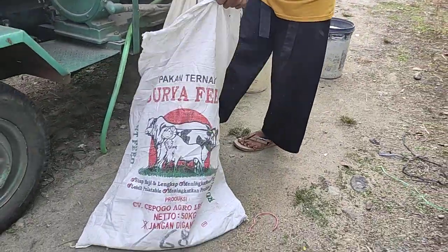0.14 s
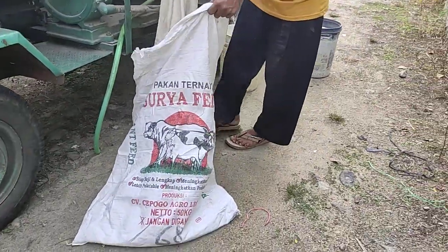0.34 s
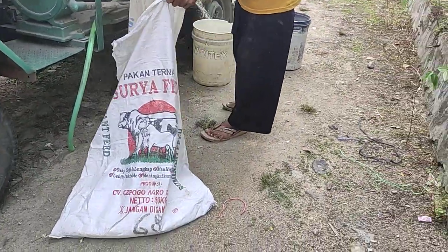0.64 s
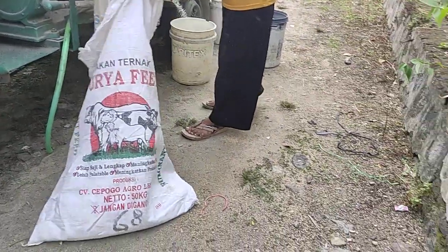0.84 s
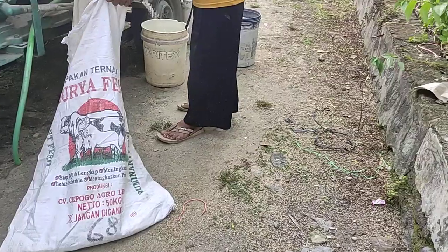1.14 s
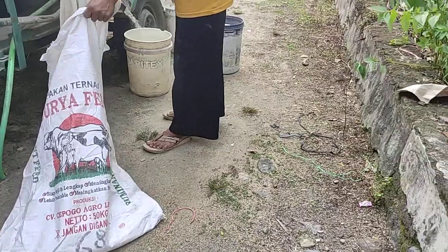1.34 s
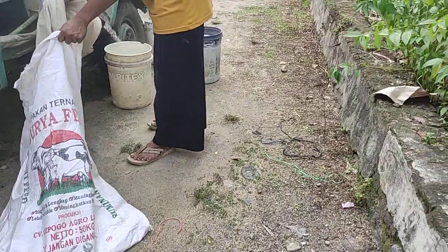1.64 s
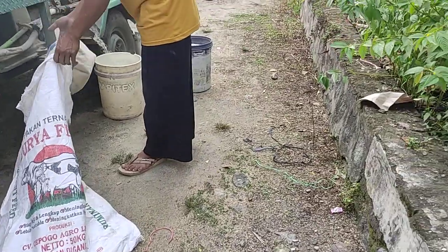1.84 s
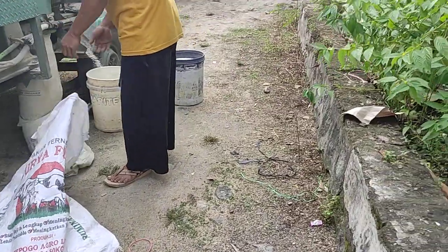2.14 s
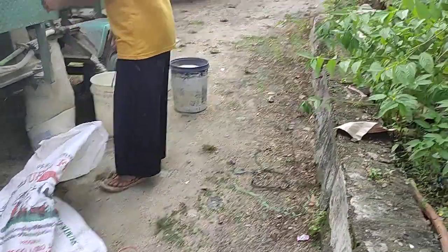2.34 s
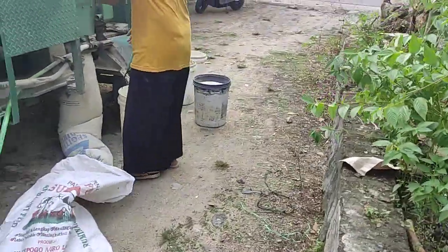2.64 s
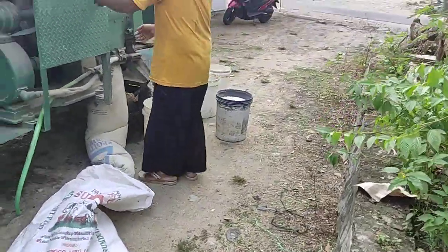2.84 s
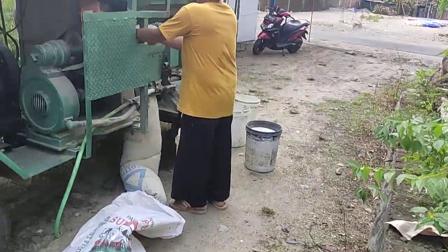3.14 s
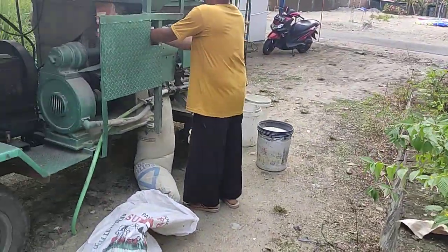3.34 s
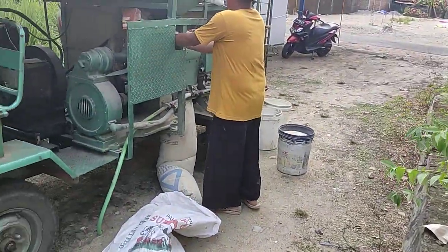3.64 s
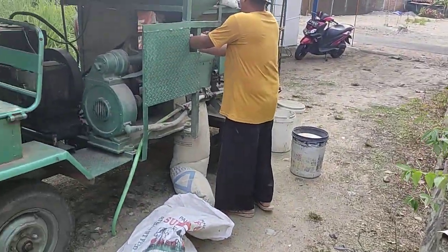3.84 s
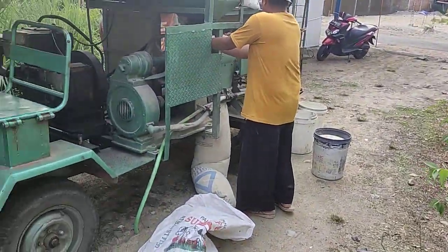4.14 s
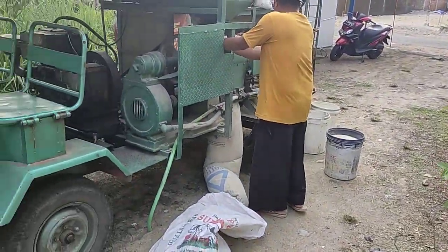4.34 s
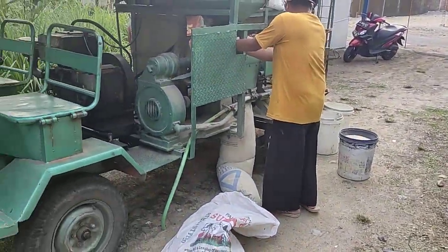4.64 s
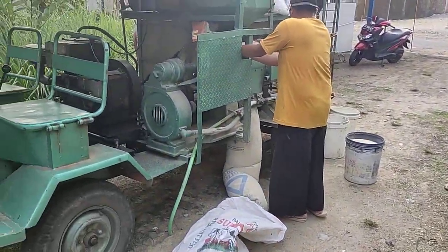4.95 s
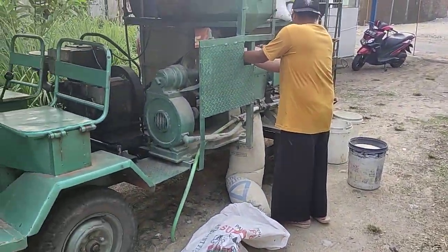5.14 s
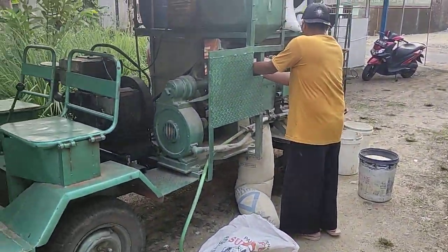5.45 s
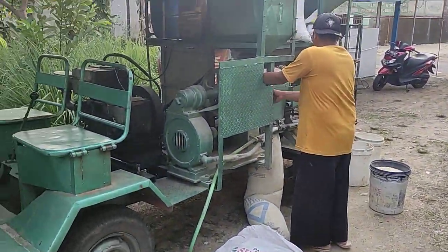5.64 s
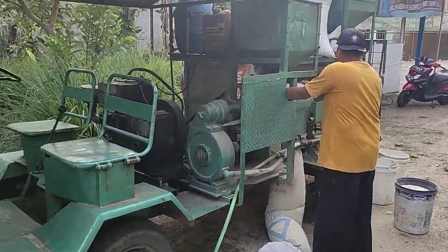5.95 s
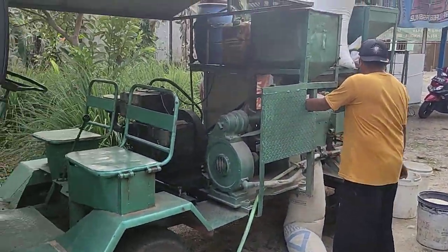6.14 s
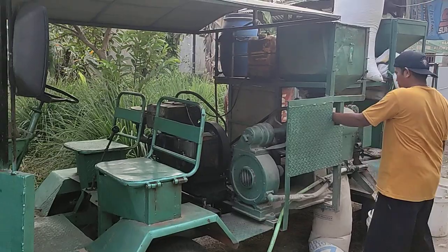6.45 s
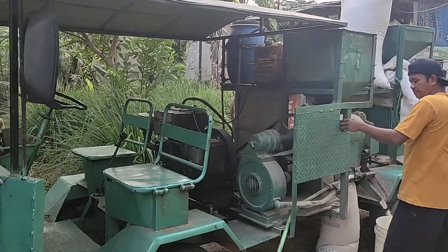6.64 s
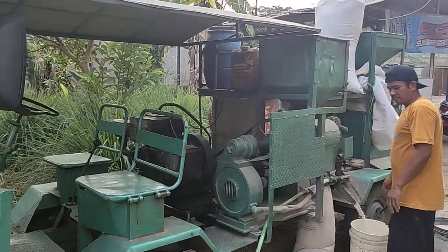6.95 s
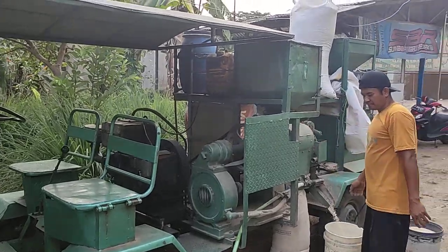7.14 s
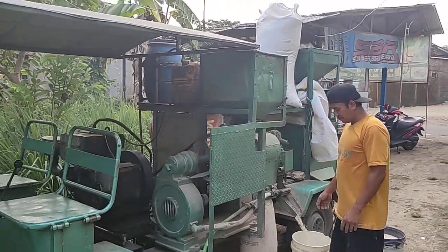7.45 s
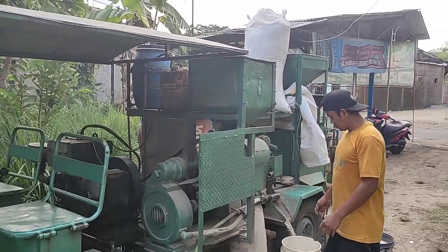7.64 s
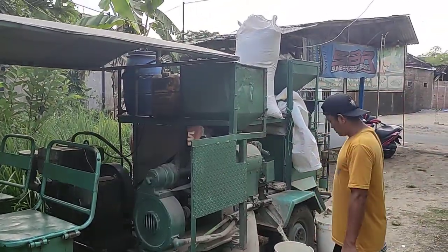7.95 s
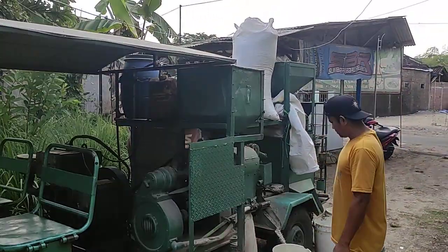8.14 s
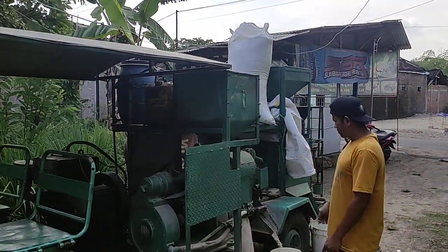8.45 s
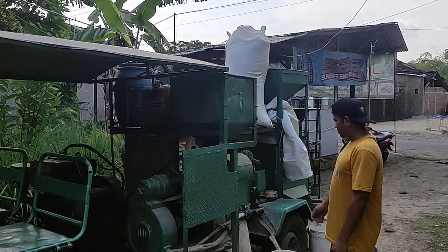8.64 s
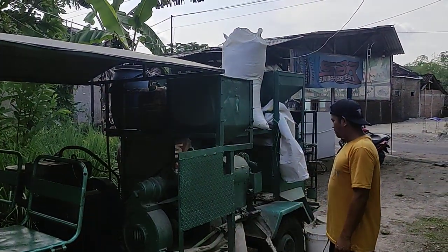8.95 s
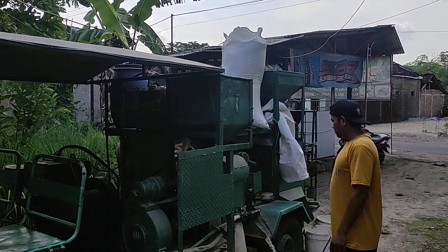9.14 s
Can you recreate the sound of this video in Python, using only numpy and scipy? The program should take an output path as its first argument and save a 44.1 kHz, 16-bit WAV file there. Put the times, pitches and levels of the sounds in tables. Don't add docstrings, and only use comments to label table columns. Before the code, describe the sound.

From 0 s to the end at about 9.3 s, a single-cylinder diesel drives a rice huller and polisher outdoors, heard loudly from a few steps away. It fires a little over nine times a second, speed wavering slightly: each cycle gives a hard metallic knock ringing near 1 kHz, a low-mid exhaust thud and a frame jolt. Valve and gear clatter pulses through a dense roar of rollers, belts, grain and a faint high blower whistle. From about 0.8 to 2.9 s the knock recedes behind the machine and hollow duct resonances colour the noise; by 3 s it returns plainly. Later the roller hiss brightens, with a chute-like resonance after 7.5 s. A loose guard sheet ticks firmly at 4.8 s, faintly at 7.3, lightly at 7.6 and hardest at 8.6. The hand-held stereo microphone drifts, its sides unequally bright, bass thin, peaks compressed and slightly clipped.

```python
import sys
import numpy as np
from scipy import signal
from scipy.fft import rfft, irfft, next_fast_len
from scipy.io import wavfile
from scipy.ndimage import map_coordinates

SR = 44100
rng = np.random.default_rng(int(sys.argv[2]) if len(sys.argv) > 2 else 0)


def field_ratio(decibels):
    return 10 ** (np.asarray(decibels, dtype=float) / 20)


def master(y):
    cut = np.clip(np.atleast_2d(y).T, -1, 1)
    pcm = np.round(cut * 32767)
    wavfile.write(sys.argv[1], SR, pcm.astype(np.int16))


N = 409248


def firings():
    # time_s, firings_per_s
    speed = [(0.053, 9.4069), (0.827, 9.4207), (1.6, 9.3702), (2.373, 9.2713), (3.147, 9.3348),
             (3.92, 9.4013), (4.693, 9.2549), (5.467, 9.1353), (6.24, 9.1474), (7.013, 9.2183),
             (7.787, 9.1959), (8.56, 9.3134), (9.333, 9.3325)]
    t = np.arange(-200, 9400) / 1000
    cycles = np.cumsum(np.interp(t, *np.transpose(speed))) / 1000
    cycles = cycles - cycles[200] + 0.1002
    return np.interp(np.arange(0, int(cycles[-1])), cycles, t)


def knock():
    # pitch_hz, level_db, t60_s
    block = [(788, -11, 0.47), (850, 0, 0.13), (910.4, 0, 0.098), (1020, -42, 0.1), (1095, -0.5, 0.16),
             (1160, -9, 0.072), (1280, -9, 0.042), (1723, 6, 0.26), (3850, -26, .01)]
    hidden, _ = walk(firings())
    shadow_db, scatter_db = -11.5, 0.7
    peak_db = -8.5 + shadow_db * hidden + scatter_db * rng.standard_normal(len(hidden))
    blow = struck(-0.001843, peak_db - 28.5, block, scatter_db=0.8, soft_s=0.0001)
    return ring(blow, hz=900, t60=0.012)


def exhaust():
    # pitch_hz, level_db, t60_s
    pipe = [(294.5, -4, 0.045), (234, -15, 0.11), (351, -8.5, 0.082)]
    cycle_s = np.gradient(firings())
    late_s = 0.4925 * cycle_s - 0.0034
    peak_db = -8 + 0.6 * rng.standard_normal(len(cycle_s))
    puff = struck(late_s, peak_db - 27, pipe, scatter_db=0.8, soft_s=0.0001)
    hidden, _ = walk(np.arange(N) / SR)
    return_db = 3 + 0.5 * hidden
    return echo(ring(puff, hz=305, t60=0.02), 0.0051, return_db)


def frame_thump():
    # pitch_hz, level_db, t60_s
    frame = [(231, -1.5, 0.12), (198, -12, 0.033), (366, -19, 0.03), (92, -16, 0.12)]
    return struck(0.02272, np.full(len(firings()), -11.0), frame, scatter_db=1.1, soft_s=0.00071)


def roar(patchy_db):
    # late_cycles, rise_s, fall_s, level_db over the roar,
    # centre_hz, width_octaves, scatter_db
    bursts = [
        (-.04, 0.003, 0.045, 3, 2350, 2.32, 1),
        (.13, 0.0027, 0.012, 0, 4740, 1.33, 2.5),
        (.18, 0.0037, 0.0074, 5, 13000, 1.7, 3),
        (.40, 0.0033, 0.0097, -3, 6000, 3.1, 2.5),
        (.73, .003, 0.017, -9.5, 12000, 0.31, 7),
        (.75, 0.0099, 0.014, 1, 111, 0.34, -3),
        (.20, 0.0029, 0.0065, 4, 111, 1.75, -2),
    ]
    # pitch_hz, level_db per Hz
    rumble = [(18, -61), (30, -45), (98, -1.5), (167, -2.5), (225, 6), (307, 3.5), (365, 4.5), (427, 0.5),
              (535, -5.5), (615, -4.5), (840, 2), (1090, 2), (1490, -2.5), (1740, -3.5), (1900, -9.5),
              (2470, -48), (4180, -120)]
    # pitch_hz, level_db per Hz
    hiss = [(1400, -16), (1900, 5), (2600, 6.5), (3200, 1.5), (4000, 1.5), (5500, -5.5), (6800, -6),
            (7000, -13.5), (8800, -3.5), (10000, -11), (11500, -25.5), (11700, -14), (14300, -20.5),
            (15300, -51)]
    # pitch_hz, share_0_to_1
    likeness = [(60, .96), (350, .95), (520, .88), (860, .8), (1300, .7), (2000, .62), (3000, .5),
                (5000, .2), (9000, .05)]
    # pitch_hz, change_db
    plain_view = [(400, 0), (570, -2.5), (870, -2.5), (1200, 0), (1700, -0.5), (2500, 1), (4300, -2.5),
                  (9000, 0)]
    # pitch_hz, change_db
    when_hidden = [(400, 2), (570, 5.5), (870, -4.5), (1200, -0.5), (1700, 6.5), (2500, 0), (4300, -2.5),
                   (9000, 2.5)]
    # pitch_hz, change_db
    when_swung = [(400, -1), (570, 0), (870, 2.5), (1200, -3.5), (1700, -3), (2500, -1.5), (4300, 7.5),
                  (9000, 0.5)]

    luck = np.clip(rng.standard_normal((len(firings()), len(bursts))), -2, 1.2)
    swells = []
    for k, (late, rise, fall, db, _, _, scatter_db) in enumerate(bursts):
        clicks = strokes(late, field_ratio(2 * (db + scatter_db * luck[:, k])))
        swells.append(smooth(smooth(clicks, rise), fall) * (rise + fall) * SR)

    hidden, swung = walk(np.arange(N) / SR)
    rattle_db = 1.02 * drift(23)
    together = drift(2.0)
    edges = 30 * 2 ** (np.arange(28) / 3)
    white = rng.standard_normal((2, 3, N))
    out = 0
    for k, (low, high) in enumerate(zip(edges, edges[1:])):
        hz = np.sqrt(low * high)
        power = 1
        for swell, (_, _, _, _, centre_hz, octaves, _) in zip(swells, bursts):
            power = power + swell * np.exp(-(np.log2(hz / centre_hz) / octaves) ** 2)
        moved_db = at_hz(plain_view, hz) + hidden * at_hz(when_hidden, hz) + swung * at_hz(when_swung, hz)
        flicker_db = moved_db + patchy_db * (0.25 * together + drift(23))
        flicker_db = flicker_db + rattle_db * hz / (hz + 1500)
        alike = np.clip(at_hz(likeness, hz), 0, 1)
        share = np.sqrt([[alike], [1 - alike], [1 - alike]])
        band_pass = signal.butter(2, [low, high], "band", fs=SR, output="sos")
        band = signal.sosfilt(band_pass, white[k % 2])
        out = out + np.sqrt(power) * field_ratio(flicker_db) * share * band

    def colour(hz):
        return 10 * np.hypot(field_ratio(-20.5 + at_hz(rumble, hz)), field_ratio(-31 + at_hz(hiss, hz)))

    return coloured(out, colour)


def hollows():
    # pitch_hz, width_hz, start_s, end_s, level_db
    parts = [
        (5430, 74, -3, 10, -40),
        (1710, 240, 7.5, 10, -19.5),
        (2360, 240, 0, 3, -24),
        (2690, 300, 3, 2.1, -38),
        (790, 150, 1.5, 2.56, -22),
    ]
    out, t = 0, np.arange(N) / SR
    for hz, width_hz, start, end, db in parts:
        t60 = np.log(1000) / (np.pi * width_hz)
        tone = ring(ring(rng.standard_normal(N), hz, t60), hz, t60)
        fade = np.clip(np.minimum(t - start, end - t) / 0.14, 0, 1)
        out = out + field_ratio(db) * tone / tone.std() * fade
    cycles = np.interp(t, firings(), np.arange(len(firings())))
    throb_db, peak_late = 4, 0.15
    return out * field_ratio(throb_db * np.cos(2 * np.pi * (cycles - peak_late)))


def ticks():
    # start_s, peak_db
    slaps = [
        (4.8019, -12),
        (7.3027, -17),
        (7.6265, -14),
        (8.6082, -9),
    ]
    # pitch_hz, level_db, t60_s
    sheet = [(3940, -4, .035), (4040, -2, .03), (4420, -14, .02)]
    s, db = np.transpose(slaps)
    clicks = np.bincount((s * SR).astype(int), field_ratio(db), N)
    return sum(field_ratio(level_db) * ring(clicks, hz, t60) for hz, level_db, t60 in sheet)


def walk(t):
    # time_s, hidden_0_to_1, swung_0_to_1
    path = [(0, 0.17, 0), (.5, 0, 0), (.88, 0.55, 0.13), (1.5, .8, 0.35), (1.95, 0.87, 0.37),
            (2.3, 0.9, 0.54), (2.8, 0.67, 0), (3.04, 0.1, 0), (3.8, 0.25, 0.58), (4.4, 0, 0.2),
            (5.3, 0.04, 0.4), (6, 0.02, 0.18), (6.6, 0.1, 0.4), (7.3, 0.23, 0.64), (7.7, 0, 0.63),
            (8.5, 0, 0.6), (9.28, 0.2, .9)]
    s, hidden, swung = np.transpose(path)
    return np.interp(t, s, hidden), np.interp(t, s, swung)


def strokes(late, heights, late_s=0):
    fired = firings()
    at = ((fired + late * np.gradient(fired) + late_s) * SR).astype(int)
    inside = (at >= 0) & (at < N)
    return np.bincount(at[inside], heights[inside], N)


def struck(late_s, peak_db, modes, scatter_db, soft_s):
    luck = rng.normal(0, scatter_db, (len(peak_db), len(modes)))
    out = 0
    for k, (hz, db, t60) in enumerate(modes):
        clicks = strokes(0, field_ratio(peak_db + db + luck[:, k]), late_s)
        out = out + ring(smooth(clicks, soft_s), hz, t60)
    return out


def ring(clicks, hz, t60):
    r, w = field_ratio(-60 / (t60 * SR)), 2 * np.pi * hz / SR
    return signal.lfilter([0, np.sin(w)], [1, -2 * r * np.cos(w), r * r], clicks + 1e-18)


def smooth(x, seconds):
    r = np.exp(-1 / (seconds * SR))
    return signal.lfilter([1 - r], [1, -r], x + 1e-18)


def echo(x, seconds, db):
    lag = int(seconds * SR)
    return x + field_ratio(db) * np.pad(x, (lag, 0))[:N]


def drift(rate):
    r = np.exp(-80 * np.pi * rate / SR)
    slow = signal.lfilter([1], [1, -2 * r, r * r], rng.standard_normal(N // 40 + 2002))[2000:]
    return np.interp(np.arange(N) / 40, np.arange(len(slow)), slow / slow.std())


def at_hz(points, hz):
    table_hz, value = np.transpose(points)
    return np.interp(np.log(hz), np.log(table_hz), value)


def coloured(x, gain):
    size = next_fast_len(N)
    return irfft(rfft(x, size) * gain(np.fft.rfftfreq(size, 1 / SR) + 1), size)[:, :N]


def scene():
    # time_s, right_lag_samples
    turning = [(0, 8), (.8, 8.5), (1.2, 14.2), (2.498, 13.7), (3, 8.5), (4, 4.8), (4.998, 5.5), (6, 4.1),
               (7, 3.3), (7.998, 4.6), (9.28, 5.2)]
    common, left, right = roar(patchy_db=1.18)
    common = common + knock() + frame_thump() + exhaust() + hollows()
    lag = np.interp(np.arange(N) / SR, *np.transpose(turning))
    late = map_coordinates(common, [np.arange(N) - lag], order=3, mode="nearest")
    return np.array([common + left, late + right]) + ticks()


def limited(x):
    limit_db, recovery_db_s = -7, 118
    climb = recovery_db_s * np.arange(N) / SR
    level_db = 20 * np.log10(np.abs(x).max(axis=0) + 1e-9)
    held_db = np.maximum.accumulate(level_db + climb) - climb
    return x * field_ratio(-0.6 * smooth(np.maximum(held_db - limit_db, 0), 0.0013))


def roll_off(x):
    return signal.sosfilt(signal.butter(12, 15580, fs=SR, output="sos"), x)


def record(dry):
    # pitch_hz, left_minus_right_db
    ports = [(60, 2.6), (330, 2), (520, 1.5), (860, 0), (1200, 0), (1700, -2), (1900, -6), (2700, -5.5),
             (3800, -3), (4800, 1), (6200, 10), (8800, 30), (10500, 22), (14000, 36)]
    heard = coloured(dry, lambda hz: field_ratio(np.minimum(at_hz(ports, hz) * [[1], [-1]], 0)))
    bass_cut = signal.butter(4, 55, "high", fs=SR, output="sos")
    heard = limited(signal.sosfilt(bass_cut, heard))
    return roll_off(np.clip(heard, -0.9, 0.9))


dry = scene()
out = record(dry)
master(out)
```